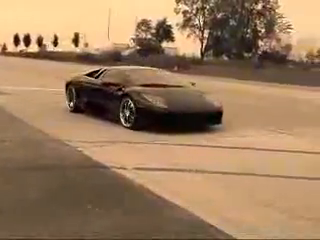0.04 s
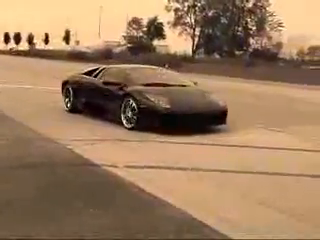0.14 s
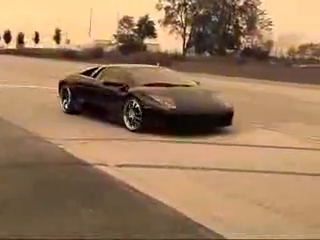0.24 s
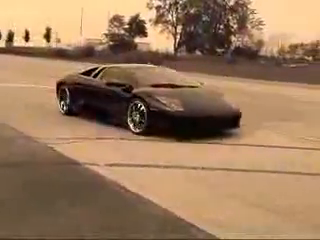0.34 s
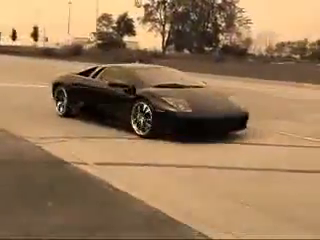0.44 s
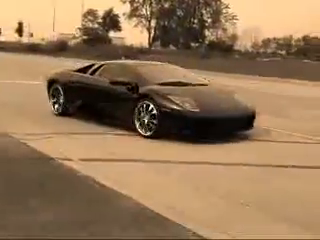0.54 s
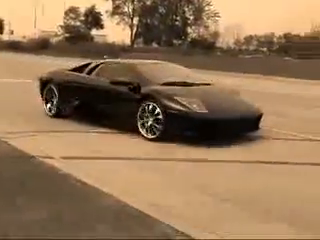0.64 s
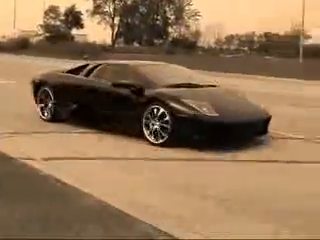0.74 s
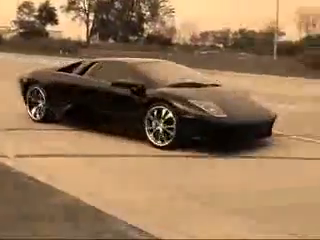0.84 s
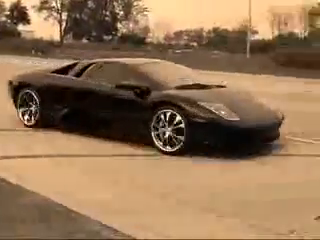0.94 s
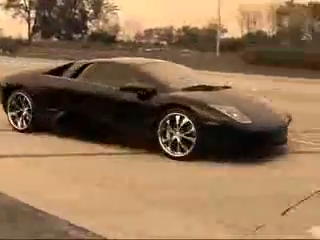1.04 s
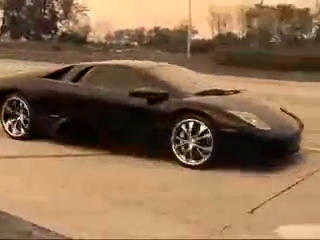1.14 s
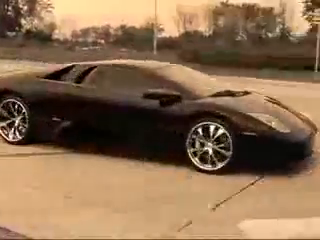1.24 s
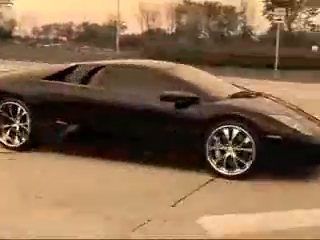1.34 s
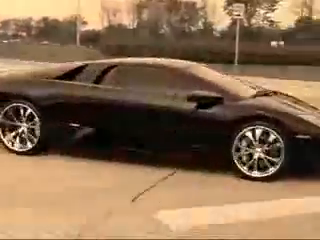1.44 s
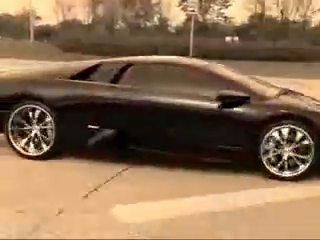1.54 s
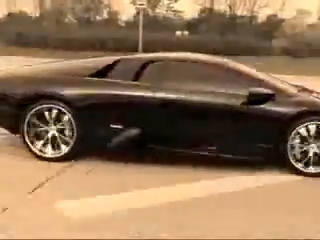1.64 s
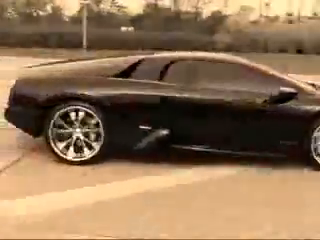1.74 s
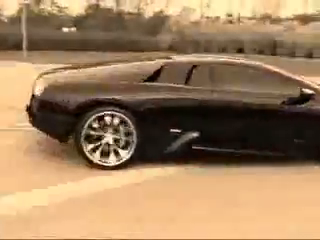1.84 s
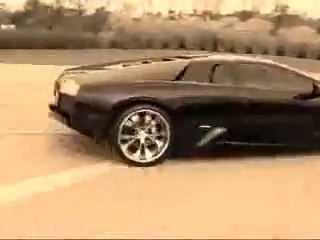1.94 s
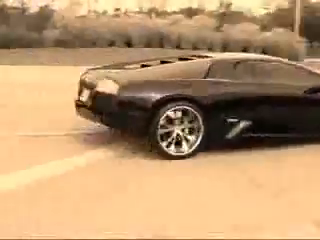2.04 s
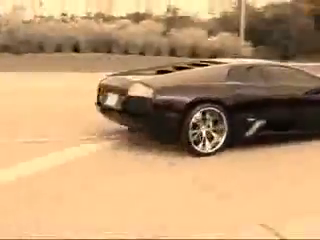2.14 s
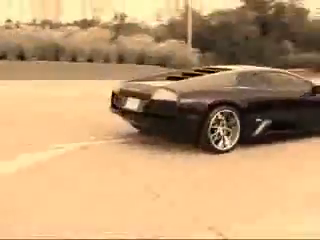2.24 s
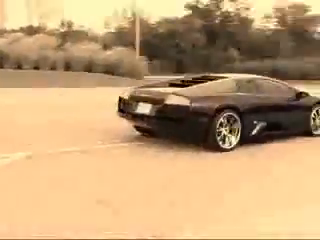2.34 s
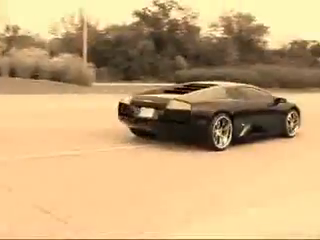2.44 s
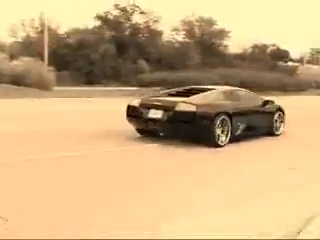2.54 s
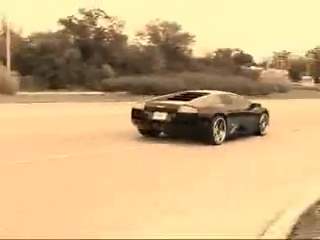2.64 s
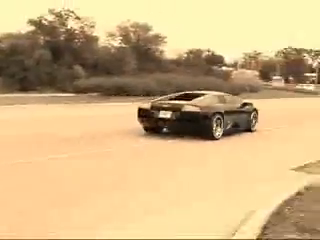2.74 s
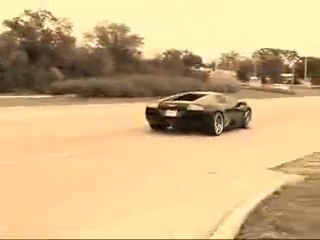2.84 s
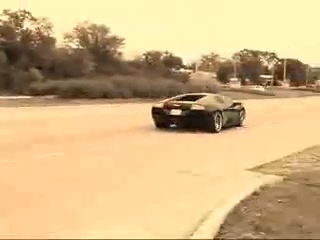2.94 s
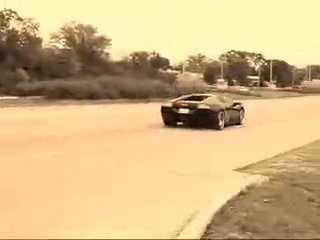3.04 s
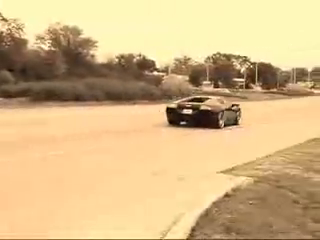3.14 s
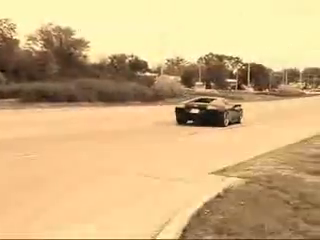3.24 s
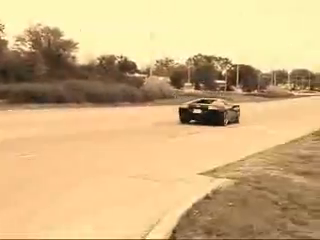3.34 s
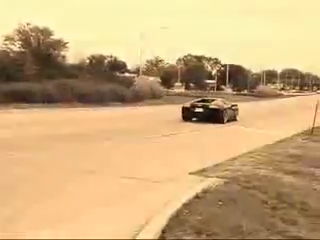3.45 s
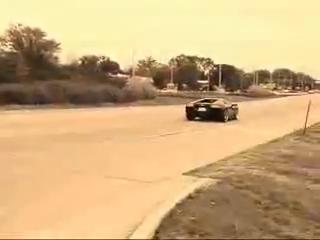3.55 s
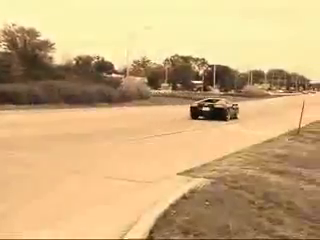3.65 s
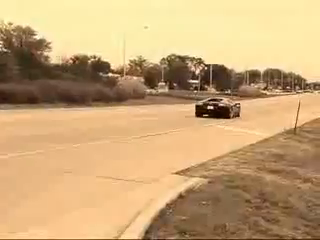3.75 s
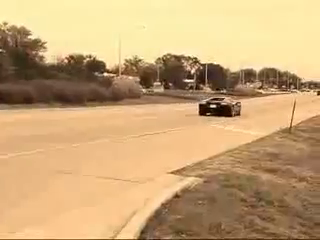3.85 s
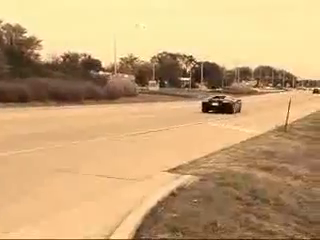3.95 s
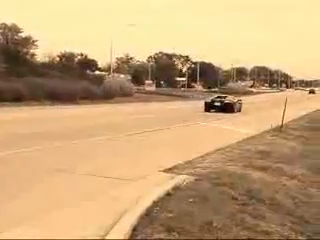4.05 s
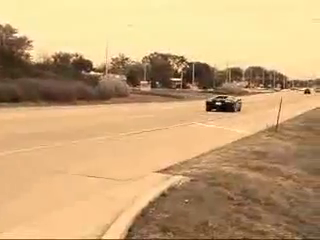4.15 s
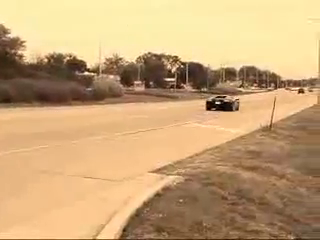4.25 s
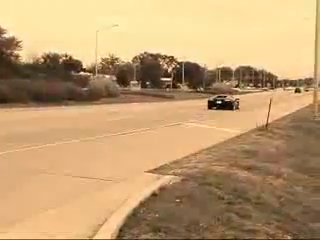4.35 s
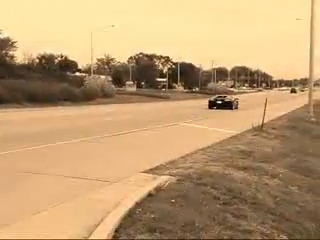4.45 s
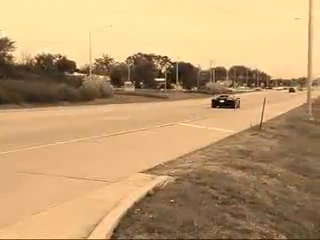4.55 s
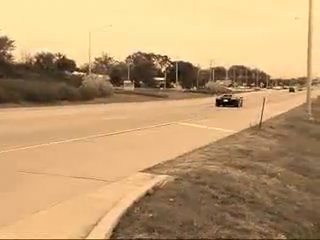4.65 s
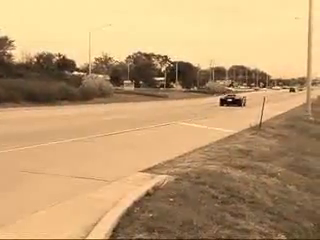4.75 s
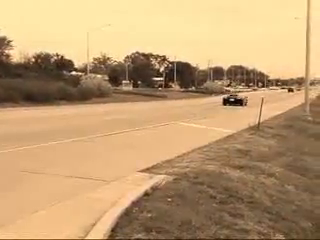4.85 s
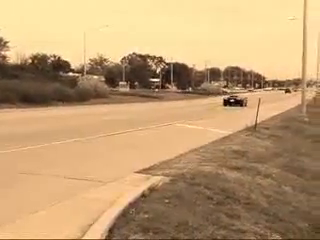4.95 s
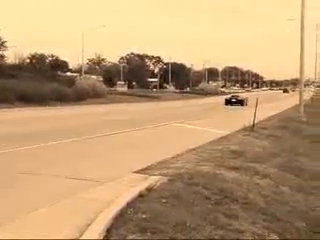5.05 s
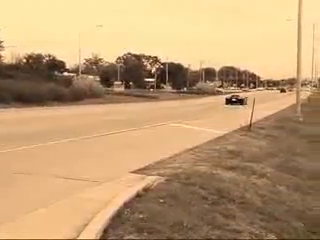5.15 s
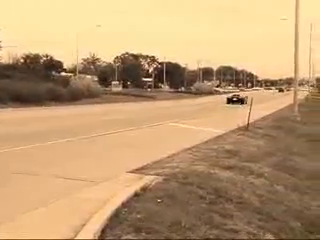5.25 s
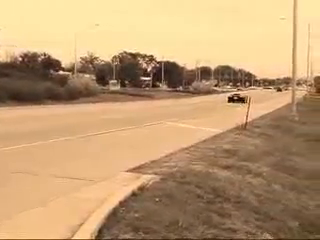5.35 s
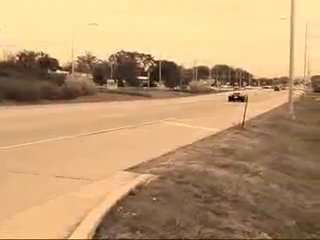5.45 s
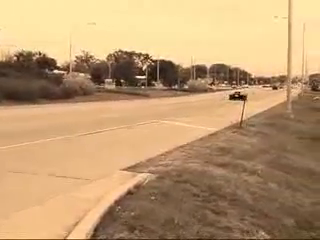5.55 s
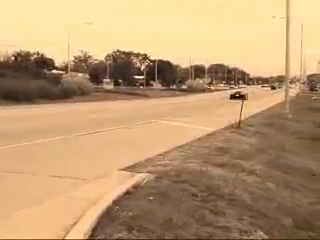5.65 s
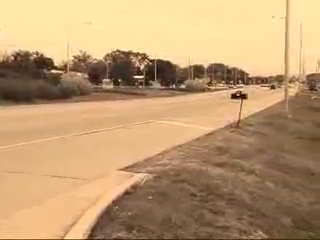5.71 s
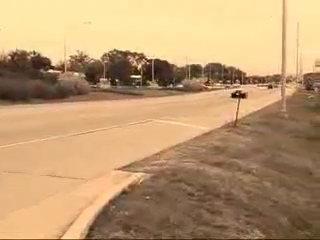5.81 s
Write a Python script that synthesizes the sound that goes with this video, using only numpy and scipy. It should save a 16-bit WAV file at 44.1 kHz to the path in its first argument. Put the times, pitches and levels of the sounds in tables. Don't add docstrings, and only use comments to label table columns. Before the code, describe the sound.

Outdoors by a wide road, a many-cylinder sports car rolls past close with a lumpy growl, mechanical clatter and gritty tyre hiss. It accelerates, the growl smoothing into a rising howl. The throttle shuts, the note sags and the exhaust pops raggedly, then the next gear bites and the pitch climbs again. Mono cheap recorder at the kerb, grainy treble and thin bass.

```python
import sys
import numpy as np
from scipy import signal
from scipy.fft import rfft, irfft
from scipy.io import wavfile

SR = 44100
rng = np.random.default_rng(int(sys.argv[2]) if len(sys.argv) > 2 else 0)


def transcribe(signal):
    frames = np.atleast_2d(signal).T
    limited = np.clip(frames, -1, 1)
    pcm = np.round(limited * 32767).astype(np.int16)
    wavfile.write(sys.argv[1], SR, pcm)


def nominal_scale(level):
    x = np.asarray(level, float) / 20
    return 10 ** x


N = 259308

# time_s, roughness_factor, throttle_0_to_1
COMBUSTION = [
    (0, 1.9, .8),
    (.9, 1.7, .9),
    (1.3, 1, 1),
    (3.34, 1.1, 1),
    (3.44, 1.3, 0),
    (3.62, 1.5, 0),
    (3.72, 2.6, 0),
    (4.1, 3, 0),
    (4.2, 1.2, 1),
    (5.88, 1.5, 1),
]


def in_time(rows):
    s, *columns = np.transpose(rows)
    return [np.interp(np.arange(N) / SR, s, c) for c in columns]


def ramp(start_s, takes_s):
    return np.clip((np.arange(N) / SR - start_s) / takes_s, 0, 1)


def swells(rows):
    s = np.arange(N) / SR
    return sum(np.outer(dbs, np.exp(-((s - at) / length) ** 2)) for at, length, *dbs in rows)


def at_hz(points, hz):
    point_hz, point_db = np.transpose(points)
    return np.interp(np.log(hz + 1), np.log(point_hz), point_db)


def rms_one(x):
    return x / np.sqrt(np.mean(x ** 2) + 1e-20)


def drift(rate):
    r = np.exp(-80 * np.pi * rate / SR)
    noise = rng.standard_normal(N // 40 + 2002)
    slow = signal.lfilter([1], [1, -2 * r, r * r], noise)[2000:]
    return np.interp(np.arange(N) / 40, np.arange(len(slow)), rms_one(slow))


def coloured(x, spectrum):
    gain = nominal_scale(at_hz(spectrum, np.fft.rfftfreq(N, 1 / SR)))
    return rms_one(irfft(rfft(x) * gain, N))


def resonance(x, hz, width_hz):
    r = np.exp(-np.pi * width_hz / SR)
    poles = [1, -2 * r * np.cos(2 * np.pi * hz / SR), r * r]
    return signal.lfilter([1, 0, -1], poles, x + 1e-18) * (1 - r * r) / 2


def throttle():
    return in_time(COMBUSTION)[1]


def tail_toward_kerb():
    return ramp(start_s=1.99, takes_s=0.26)


def far_away():
    return ramp(start_s=3.82, takes_s=0.27)


def bank_clicks(cycles):
    clicks = np.diff(np.floor(cycles / 2 + 0.0089 * drift(20)), prepend=0)
    return throttle() * rms_one(clicks - clicks.mean())


def gas_noise(cycles, spectrum, db, gated, patchy_db, clicky):
    strength = nominal_scale(0.7 * rng.standard_normal(4000))[cycles.astype(int)]
    puffs = 1 - gated + gated * strength * (1 + np.cos(2 * np.pi * cycles)) ** 2 / 6.9
    gas = rms_one(puffs * rng.standard_normal(N)) + clicky * bank_clicks(cycles)
    return nominal_scale(db + patchy_db * drift(13)) * coloured(gas, spectrum)


def tyre_hiss(cycles, road_db):
    # pitch_hz, level_db_per_hz
    hiss = [(2000, -45), (2850, -20), (3080, -3), (3250, -1), (3600, -2), (3900, -4.5), (4300, -1.5),
            (5000, -5), (5800, -10), (7000, -12.5), (8500, -23), (9300, -21), (9900, -19.5), (10600, -35.5)]
    # time_s, length_s, rise_db
    grit = [
        (.79, .008, 2),
        (.945, 0.0091, 4),
        (1.03, .008, 2.5),
        (1.07, 0.009, 3.5),
        (1.16, 0.01, 3.5),
        (2.5, .06, 1.5),
    ]
    hiss_db = road_db + swells(grit)[0] - .6
    return gas_noise(cycles, hiss, hiss_db, gated=0.12, patchy_db=.8, clicky=.08)


def low_thrum(cycles):
    # pitch_hz, level_db_per_hz
    thrum = [(20, -16), (40, -17.5), (70, -8.5), (110, 4), (160, -10.5), (260, -38.5)]
    thrum_db = -41 - 20 * ramp(start_s=1.1, takes_s=0.89) + 2 * far_away()
    return gas_noise(cycles, thrum, thrum_db, gated=.1, patchy_db=1.5, clicky=0)


def bay_clatter(cycles, swing_db):
    # pitch_hz, level_db_per_hz
    clatter = [(600, -26.5), (950, -2), (1300, -2.5), (1700, -5.5), (2150, -6.5), (2450, -7), (2700, -14.5),
               (2950, -22.5), (4000, -56.5)]
    bay_facing = 1 - ramp(start_s=1.02, takes_s=0.34)
    clatter_db = -36 + 0.78 * swing_db + 5 * bay_facing + 3 * far_away()
    return gas_noise(cycles, clatter, clatter_db - 3.5, gated=0.41, patchy_db=0.34, clicky=0.35)


def exhaust_rasp(cycles, swing_db, surge_db):
    # pitch_hz, level_db_per_hz
    rasp = [(250, -41), (450, 1.5), (560, -4.5), (670, 2), (760, -2), (830, 0), (940, -14.5), (1100, -38.5),
            (2000, -44.5)]
    rasp_db = surge_db - 29.5 + 0.76 * swing_db + 1.5 * tail_toward_kerb() - 8.5 * (1 - throttle())
    return gas_noise(cycles, rasp, rasp_db - 3.5, gated=0.1, patchy_db=1.64, clicky=0.047)


def exhaust_rumble(cycles, rumble_db):
    # pitch_hz, level_db_per_hz
    rumble = [(30, -54.5), (70, -43.5), (110, -9), (210, 3.5), (330, 1), (440, 1), (560, -8.5),
              (900, -44.5)]
    return gas_noise(cycles, rumble, rumble_db - 4.0, gated=0.62, patchy_db=2.5, clicky=0)


def whistles(cycles):
    # start_s, end_s, pitch_hz, width_hz, level_db
    resonances = [(-.2, 1.25, 1125, 70, -43), (-.3, 1.15, 950, 250, -40), (0, 1.2, 3000, 500, -55),
                  (1.45, 1.9, 660, 60, -37), (2.15, 2.7, 215, 60, -29), (2.12, 2.7, 1380, 350, -37),
                  (2.1, 2.92, 1960, 150, -38), (2.35, 3, 2300, 200, -45), (2.3, 2.7, 4800, 700, -47),
                  (3.1, 4.3, 825, 30, -46), (4.2, 4.95, 1900, 110, -46), (4.17, 4.5, 1100, 130, -40)]
    out, s = np.zeros(N), np.arange(N) / SR
    clicks = bank_clicks(cycles)
    for start, end, hz, width_hz, db in resonances:
        pulsed = .4 if 900 < hz < 2500 else .08
        air = pulsed * clicks + (1 - pulsed) * rng.standard_normal(N)
        tone = rms_one(resonance(resonance(air, hz, width_hz), hz, width_hz))
        fade = np.sin(np.pi * np.clip((s - start) / (end - start), 0, 1)) ** .7
        out += nominal_scale(db + 1.8 * drift(14)) * tone * fade
    return out


def pops():
    # start_s, peak_db, ring_hz
    bursts = [(3.878, -22, 300), (3.895, -21, 300), (3.907, -13, 250), (3.921, -15, 290), (3.946, -20, 280),
              (3.993, -20, 300), (4.0205, -12, 290), (4.0335, -12, 280), (4.062, -22, 280),
              (4.078, -26, 290), (4.118, -20, 300), (4.139, -14, 280), (4.151, -12, 300)]
    out, s = np.zeros(N), np.arange(1300) / SR
    rise_s = .0028
    for start, db, hz in bursts:
        ring = -np.sin(2 * np.pi * hz * s) * (s / rise_s) * np.exp(1 - s / rise_s)
        burst = rng.standard_normal(len(s)) * np.exp(-s / .007)
        crack = 1.1 * resonance(resonance(burst, 620, 500), 620, 500)
        at = round(start * SR)
        out[at:at + len(s)] += nominal_scale(db) * (ring + crack)
    return out


def pipe_db(hz):
    # centre_hz, width_hz, flank_db, behind_db, far_behind_db
    modes = [(120, 17, -51, -20, -31), (152.4, 66, -20, -34.5, -27.5), (213, 22.6, -13, -22, -29),
             (262, 9.5, -34, -56.5, -53.5), (321.5, 53, -16.5, -35.5, -44), (399, 26, -40, -23.5, -38),
             (483.6, 68, -48, -25.5, -18.5), (567, 55, -27.5, -25, -54), (634, 33, -28, -17, -22),
             (681, 46, -44, -43.5, -20.5), (716, 73, -31.5, -24, -32), (826, 49, -41.5, -28, -19),
             (907, 70, -48.5, -21.5, -23), (1090, 100, -43, -47, -29.5)]
    hz, behind, far = hz[::50], tail_toward_kerb()[::50], far_away()[::50]
    power = 0
    for centre, width, flank, tail, distant in modes:
        mode_db = flank + behind * (tail - flank) + far * (distant - tail)
        power = power + nominal_scale(mode_db) ** 2 / (1 + (2 * (hz - centre) / width) ** 2) ** 1.725
    power = power / (1 + (110 / hz) ** 13)
    return np.interp(np.arange(N) / 50, np.arange(len(hz)), 10 * np.log10(power))


def order(cycles, multiple, db, flutter_db, waver):
    rough = in_time(COMBUSTION)[0]
    phase = 2 * np.pi * multiple * cycles + 2.15 * (multiple % 1) + rough * waver * drift(9.5)
    return np.sqrt(2) * nominal_scale(db + rough * flutter_db * drift(16.2)) * np.cos(phase)


def uneven_cylinders(cycles, hz, base_db):
    # multiple_of_note, level_over_rumble_db
    lines = [(.25, -14), (.75, -5.5), (1.25, -4.5), (1.75, -3.5), (2.25, -12), (2.75, -11), (3.5, -10.5),
             (4, -10.5), (4.5, -20.5), (5, -24)]
    # pitch_hz, level_db
    colour = [(60, -44.5), (100, -6), (150, -3), (700, -9.5), (950, -7.5), (1300, -6), (2500, 8)]
    shut_db = -5 * (1 - throttle())
    out = np.zeros(N)
    for multiple, db in lines:
        line_hz = multiple * hz
        pipe_share_db = .4 * (pipe_db(line_hz) + 30)
        line_db = base_db + db + at_hz(colour, line_hz) + pipe_share_db + multiple * shut_db
        out += order(cycles, multiple, line_db + 1.9 * drift(1.6), flutter_db=2.0, waver=0.36)
    return out


def exhaust_note(cycles, hz):
    # time_s, firing_note_db
    effort = [(0, -24.5), (.5, -20.5), (.85, -16), (1.2, -16.5), (1.5, -13.5), (1.8, -15), (1.92, -12.5),
              (2.6, -12), (2.9, -18.5), (3.33, -16), (3.5, -21.5), (3.8, -29.5), (3.9, -36), (4.1, -37),
              (4.19, -13.5), (4.8, -13), (5.15, -16.5), (5.88, -13.5)]
    # time_s, length_s, note_db, other_orders_db
    cancels = [(.18, 0.13, 1.5, -3.5), (.67, 0.044, -2.5, -5.5), (2.83, 0.046, -.1, -6.5),
               (3.16, .03, -2, -4), (3.422, 0.056, -8.5, -7), (4.2, 0.032, 1.2, -5.5),
               (4.368, 0.051, -4, -0.5), (4.68, 0.044, 0.3, -2), (5.33, 0.031, -1.7, -4),
               (5.751, 0.032, -8, -4), (5.88, .025, -11.5, -10.1)]
    # multiple_of_note, into_pipe_db, off_throttle_db, flutter_db, phase_waver_rad
    orders_fed = [(1 / 2, 0, -7, .8, .35), (3 / 2, -2.8, -14, 1.4, .26), (4 / 2, 0, -22, 2, .14),
                  (5 / 2, -6, -24, 2.3, .22), (6 / 2, -7, -28, 2.1, .18)]
    shut = 1 - throttle()
    cancel_db, others_db = swells(cancels)
    washed_db = -17 * np.clip((hz - 324) / 14, 0, 1)
    out = order(cycles, 1, in_time(effort)[0] + cancel_db, flutter_db=.9, waver=.16)
    for multiple, fed_db, shut_db, flutter_db, waver in orders_fed:
        db = fed_db + shut * shut_db + pipe_db(multiple * hz) + others_db + (multiple > 2) * washed_db
        out += order(cycles, multiple, db, flutter_db, waver)
    return out


def scene():
    # time_s, firing_note_hz
    revs = [(0, 130), (.16, 129.3), (.47, 98.9), (.6, 113.9), (.77, 120), (1.4, 163.7), (2.3, 277),
            (2.45, 290.2), (2.62, 319.8), (3.34, 407.6), (3.42, 400.6), (3.6, 398.5), (4.0, 270.9),
            (4.2, 311), (4.37, 298), (4.5, 309.9), (5.2, 354.8), (5.88, 390.2)]
    # time_s, level_db
    road = [(0, -48.5), (.6, -46.5), (.9, -42.5), (1.05, -41.5), (1.22, -47.5), (1.35, -48.5), (1.8, -44),
            (1.97, -50.5), (2.25, -45), (2.55, -45), (2.85, -47.5), (3.3, -45.5), (3.45, -47), (4.0, -51),
            (4.45, -44.5), (4.7, -46), (5.3, -43.5), (5.88, -43)]
    # time_s, length_s, rumble_db, rasp_db, uneven_lines_db
    surges = [(1.05, 0.079, 8, -2, -6), (1.62, 0.16, 2.5, -0.8, 3), (2.08, 0.069, -6.5, -7, 9.5),
              (2.27, 0.057, -3, 6.5, 8.5), (2.93, 0.16, 0.5, 0.3, -22), (3.3, 0.11, 2.7, -3, 1.5),
              (3.45, 0.11, -4, 5.5, 2.5), (3.62, .09, 5.5, 0.5, .1), (4.17, 0.025, 11, -3, -4),
              (4.42, 0.2, 2.5, 3.5, 0.5), (5.1, 0.14, 2, 2.5, -13), (5.45, 0.083, 1.2, 3, 4.5)]
    hz, road_db = in_time(revs)[0], in_time(road)[0]
    cycles = np.cumsum(hz) / SR
    swing_db = road_db - road_db.mean()
    rumble_surge, rasp_surge, uneven_surge = swells(surges)
    rumble_db = rumble_surge - 30.5 + 0.32 * swing_db + 3.5 * tail_toward_kerb()
    car = tyre_hiss(cycles, road_db)
    car += low_thrum(cycles)
    car += bay_clatter(cycles, swing_db)
    car += exhaust_rasp(cycles, swing_db, rasp_surge)
    car += exhaust_rumble(cycles, rumble_db)
    car += whistles(cycles) + pops()
    car += uneven_cylinders(cycles, hz, rumble_db + 0.05 + uneven_surge)
    car += exhaust_note(cycles, hz)
    return car[None]


def coarse_grain(x, grain_db):
    hz, s, cells = signal.stft(x, SR, nperseg=2048)
    depth_db = grain_db * np.clip(hz / 1500 - .6, 0, 1)[:, None]
    cells = cells * nominal_scale(depth_db * rng.standard_normal(cells.shape[1:]))
    return signal.istft(cells, SR, nperseg=2048)[1][:, :N]


def converter_images(x):
    # pitch_hz, level_db
    beats = [(3500.3, -55), (3900.3, -45), (4300.3, -53), (7400.7, -61), (7800.8, -52), (8200.8, -51),
             (8600.8, -62)]
    turned = signal.hilbert(x).imag
    for k, (hz, db) in enumerate(beats):
        beat = 2 * np.pi * hz * np.arange(N) / SR
        x = x + 2 * nominal_scale(db) * (turned * np.sin(beat) if k % 2 else x * np.cos(beat))
    return x


def low_pass(x):
    return signal.sosfilt(signal.butter(12, 9890, fs=SR, output="sos"), x)


def record(dry):
    x = .95 * np.tanh(coarse_grain(dry, grain_db=3.5) / .95)
    x = signal.sosfilt(signal.butter(2, 44.7, "high", fs=SR, output="sos"), x)
    x = converter_images(x)
    x = signal.sosfiltfilt(signal.cheby2(8, 40, 10800, fs=SR, output="sos"), x)
    return low_pass(x)


dry = scene()
out = record(dry)
transcribe(out)
```